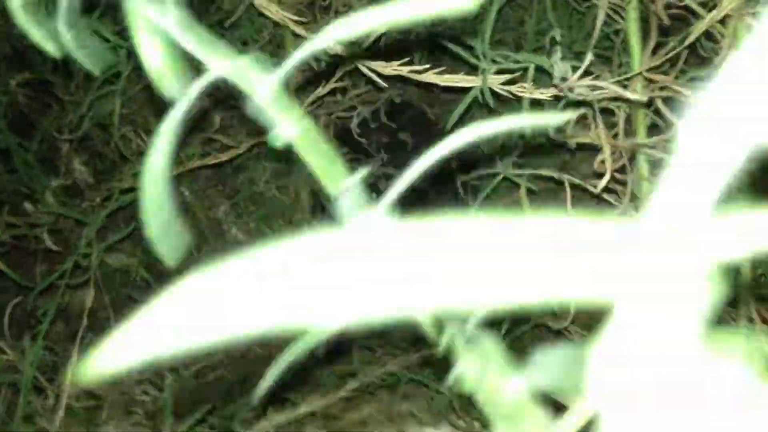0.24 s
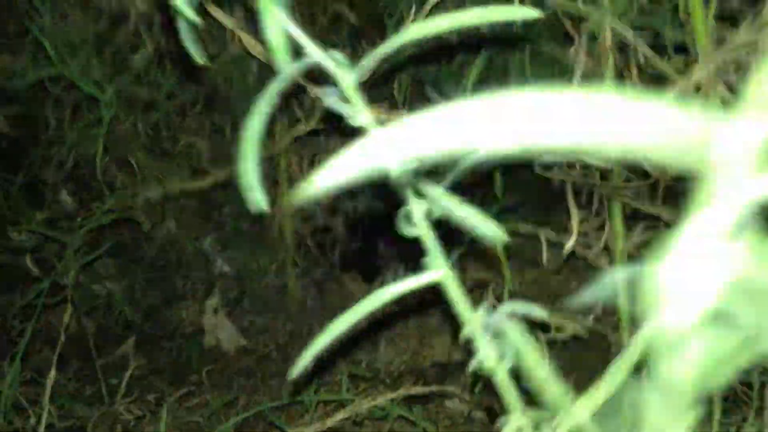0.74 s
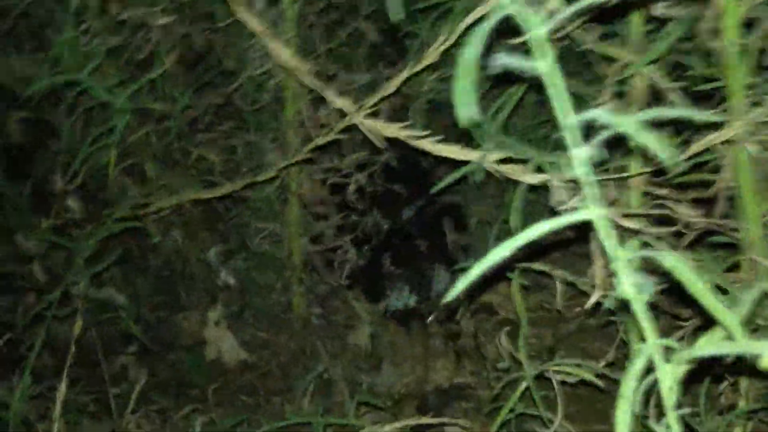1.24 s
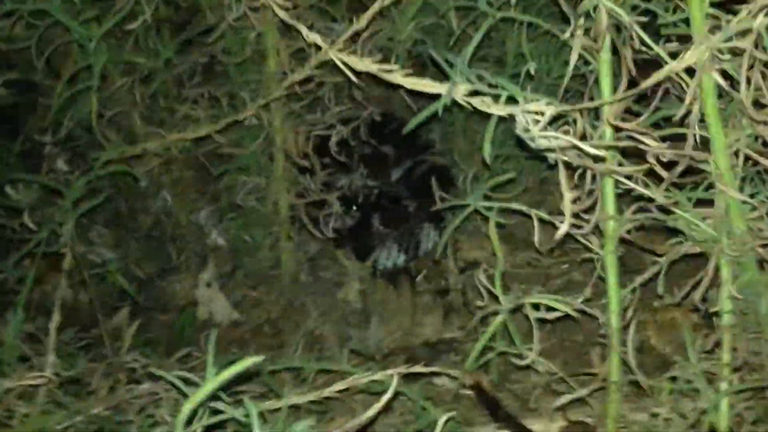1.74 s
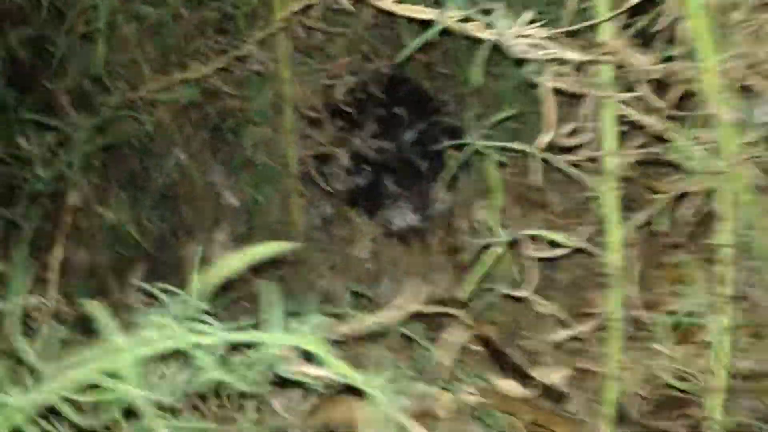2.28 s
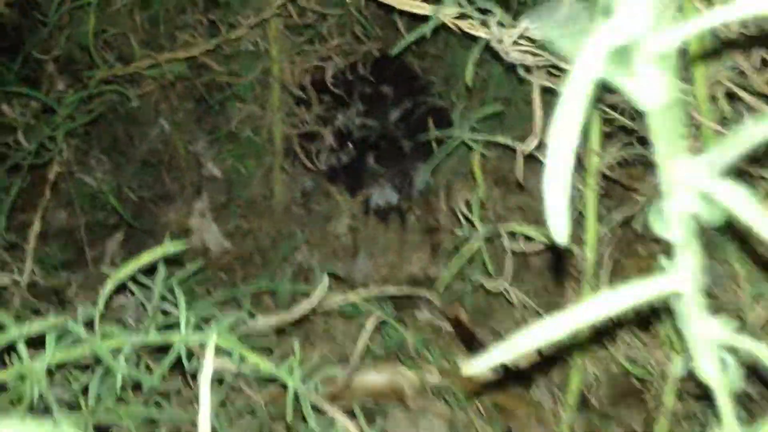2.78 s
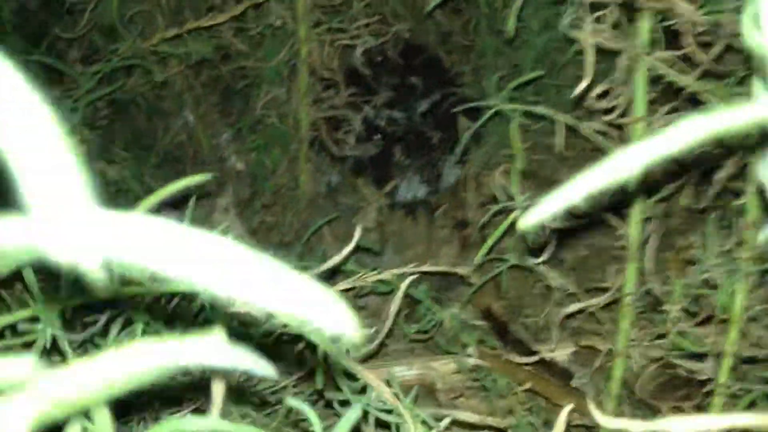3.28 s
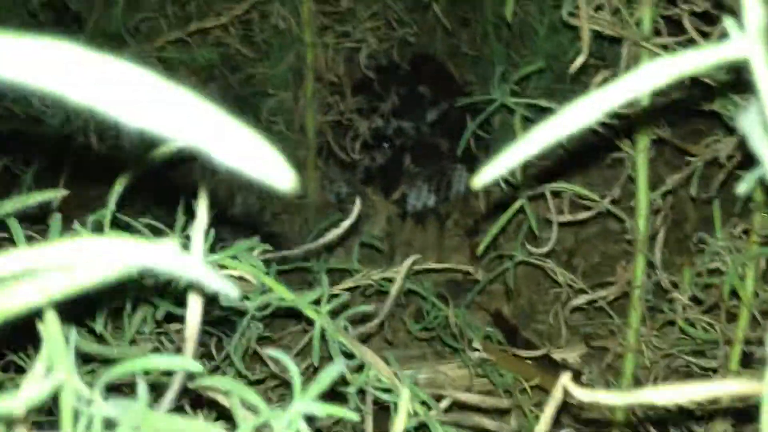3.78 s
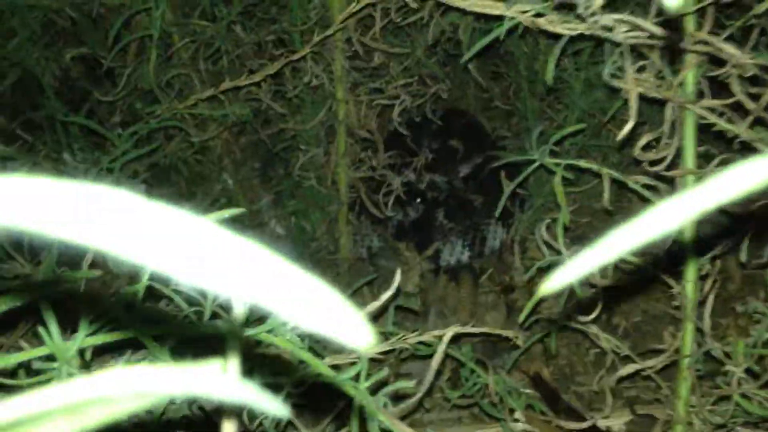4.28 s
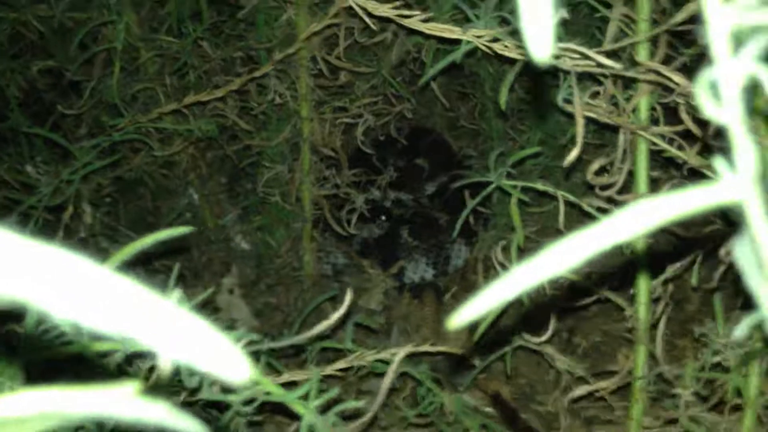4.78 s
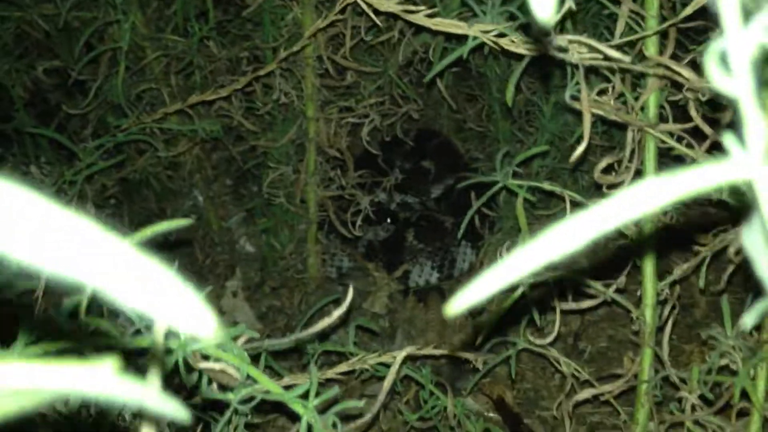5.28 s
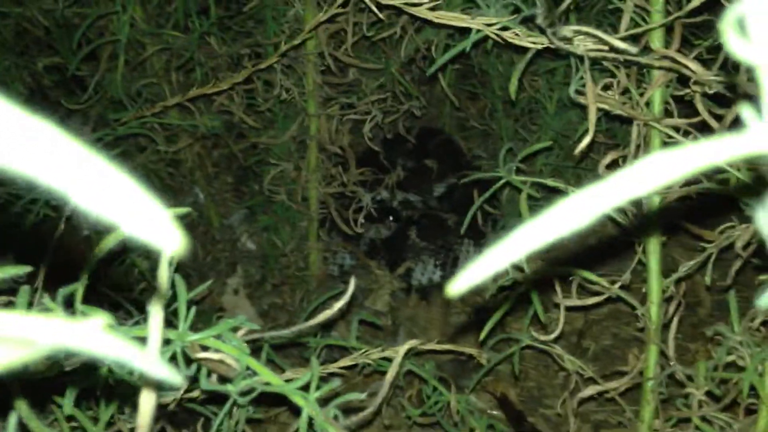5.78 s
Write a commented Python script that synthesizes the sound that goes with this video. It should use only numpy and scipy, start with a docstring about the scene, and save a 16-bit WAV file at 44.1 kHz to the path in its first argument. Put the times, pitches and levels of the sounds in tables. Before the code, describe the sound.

Continuous dry, sizzling rattle of a snake in weeds at night, with a brief cluster of twig snaps and leaf rustles.

```python
"""In weeds at night, a coiled rattlesnake buzzes its tail close to a handheld mono camera.
The tail swings about 60 times a second; at each turn the dry segments clatter and ring in their
hollow shells. An echo off the ground colours the buzz as the camera moves.
Stems snap and leaves brush past, with a few soft knocks, over a faint low rumble."""
import sys
import numpy as np
from scipy import signal
from scipy.fft import rfft, irfft, next_fast_len
from scipy.io import wavfile
from scipy.ndimage import map_coordinates

SR = 44100
rng = np.random.default_rng(int(sys.argv[2]) if len(sys.argv) > 2 else 0)


def generate_wav(sig):
    """Save sig (samples, or channels by samples) to the path in sys.argv[1] as 16-bit PCM at SR."""
    pcm = np.round(np.clip(np.atleast_2d(sig).T, -1, 1) * 32767).astype(np.int16)
    wavfile.write(sys.argv[1], SR, pcm)


N = 265923

# The snake briefly shakes harder.
# Each row: middle in seconds, extra swings a second, half length in seconds.
HARDER_SHAKES = [(2.153, 2.85, 0.37), (3.946, 3.09, .42)]
# How loud the rattle is. Each row: time in seconds, level in dB.
RATTLE_LEVELS = [(0, -31.5), (.9, -32), (1.4, -32.5), (3.1, -32), (6, -32)]
# The tone of the wide segments at the base. Each row: frequency in Hz, level in dB.
BASE_TONE = [(100, -67), (600, -48), (1750, -27.5), (2500, -12), (2950, -7.5), (3200, -7.5), (3450, -2.5),
             (3720, 0.7), (4200, -5), (4450, -10), (4950, -7), (6500, -11.5), (9000, -27)]
# The tone of the narrow segments at the tip. Each row: frequency in Hz, level in dB.
TIP_TONE = [(100, -76), (2000, -36.5), (4450, -22), (5000, -8.5), (5800, 0), (7300, 1), (8200, -7),
            (9200, -8.5), (10400, -4), (11700, 2), (12700, 0), (13600, -3), (14800, -2)]

def rattle(t):
    """Loose, hollow segments hit each other all the time, hardest at the two turns of each swing."""
    extra_hz = sum(hz * np.exp(-((t - s) / length) ** 2) for s, hz, length in HARDER_SHAKES)
    swing_hz = (59.3 + extra_hz) * (1 + 0.0064 * wobble(25.0))
    phase = 2 * np.pi * np.cumsum(swing_hz) / SR
    # the faster the tail swings, the more one turn outweighs the other
    lopsided = np.clip(0.28 + 0.093 * extra_hz, 0, 1)
    turns = lopsided * np.cos(phase) + (1 - lopsided) * np.cos(2 * phase)
    level_db, = curves(RATTLE_LEVELS, t)
    force_db = level_db + 1.9 * turns + 0.32 * wobble(11)
    # base and tip share the swing but jostle each in their own way
    base_hits = amp(0.56 * wobble(200) + 0.28 * wobble(10)) * contacts(rate=8000, scatter_db=1.5)
    tip_hits = amp(0.18 * wobble(250)) * contacts(rate=11000, scatter_db=2.0)
    base = amp(force_db - 5.0) * coloured(base_hits, BASE_TONE)
    tip = amp(force_db + 4.0) * coloured(tip_hits, TIP_TONE)
    return base + tip

def shifting_shells(buzz, swell_db=1.5, patch_hz=128.9, patch_s=0.12):
    """The loose shells keep shifting, so their ring swells and fades in patches of pitch and time."""
    hz, t, spectrum = signal.stft(buzz, SR, nperseg=1024)
    grid = np.meshgrid(hz / patch_hz, t / patch_s, indexing="ij")
    patches = map_coordinates(rng.standard_normal((512, 512)), grid, mode="wrap")
    return signal.istft(spectrum * amp(swell_db * patches), SR, nperseg=1024)[1][:N]

# The echo off the ground shifts as the camera moves.
# Each row: time in seconds, weakened frequency in Hz, boost or cut in dB of a band below it.
GROUND_ECHO = [(.2, 8400, -3), (1.3, 8370, 1), (2.2, 8400, -0.5), (2.7, 8200, -4), (3.6, 7850, 2),
               (4.2, 7830, 3), (5.2, 8070, 3)]

def ground_echo(buzz, dip_db=-9, dip_width_hz=235, lift_below_hz=1060, lift_width_hz=270):
    """The buzz and its echo partly cancel in one narrow band; a band below it swells and fades."""
    hz, t, spectrum = signal.stft(buzz, SR, nperseg=1024)
    dip_hz, lift_db = curves(GROUND_ECHO, t)
    dip = dip_db / (1 + ((hz[:, None] - dip_hz) / dip_width_hz) ** 2)
    lift = lift_db / (1 + ((hz[:, None] - dip_hz + lift_below_hz) / lift_width_hz) ** 2)
    return signal.istft(spectrum * amp(dip + lift), SR, nperseg=1024)[1][:N]

# Dry stems snapping. Each row: start in seconds, level in dB, pitch in Hz,
# length of the tear in seconds, boost or cut of the crack in dB.
STEM_SNAPS = [(1.8108, -13, 13600, 0.0011, -15), (1.931, -21, 7160, 0.0012, 2.5),
              (2.0325, -14.5, 6500, 0.0026, -2), (2.1624, -3.5, 14000, 0.001, -9),
              (2.335, -14, 12100, .001, -11), (2.346, -17, 11700, 0.0031, -7)]
# The tone of a cracking stem. Each row: frequency in Hz, level in dB.
CRACK_TONE = [(100, -31), (250, -15), (1200, -5.5), (2000, -4.5), (4000, 3.5), (9000, 0), (15000, -4.5)]

def snapping_stems(t):
    """Each stem tears in a brief burst around one pitch, with a noisy crack that dies in the weeds."""
    out = np.zeros(N)
    for start, db, hz, length, crack_db in STEM_SNAPS:
        age = np.maximum(t - start, 0)
        burst = np.sin(np.pi * np.minimum(age / length, 1))
        tear = burst * np.sin(2 * np.pi * hz * age + 0.75 * wobble(2500))
        fade = amp(crack_db - 7 - 60 * age / 0.02) * (age > 0)
        crack = fade * coloured(rng.standard_normal(N), CRACK_TONE)
        out += amp(db) * (tear + crack)
    return out

# Leaves brushing past. Each row: middle in seconds, level in dB, half length in seconds.
LEAF_BRUSHES = [(1.805, -31.5, 0.024), (2.036, -24, 0.02), (2.15, -26.5, 0.021), (2.308, -26.5, 0.045),
                (2.355, -24.5, 0.027)]
# The tone of the leaves. Each row: frequency in Hz, level in dB.
LEAF_TONE = [(40, -43), (220, -20), (450, -7.5), (900, -16), (1700, -6.5), (4000, -4), (8000, 6),
             (12000, 4), (15000, 13)]

def brushing_leaves(t):
    """Leaves scrape past in short swells of fine crackle."""
    power = sum(amp(db) ** 2 * np.exp(-((t - s) / length) ** 2) for s, db, length in LEAF_BRUSHES)
    return np.sqrt(power) * coloured(contacts(rate=8000, scatter_db=4.5), LEAF_TONE)

# Soft knocks. Each row: start in seconds, level in dB, pitch in Hz, seconds to fade by 60 dB.
SOFT_KNOCKS = [(0.265, -46, 234, 0.12), (.879, -45, 1470, .04), (1.932, -38, 700, 0.0098),
               (2.035, -41, 520, 0.011), (2.1613, -35, 397, 0.022), (2.329, -42, 1100, .012),
               (2.985, -32.5, 890, 0.006), (3.099, -40, 810, .02), (4.067, -44, 1150, .012)]

def soft_knocks(t):
    """Dull blows on stems and ground ring unsteadily and die away fast."""
    out = np.zeros(N)
    for start, db, hz, fade_s in SOFT_KNOCKS:
        age = np.maximum(t - start, 0)
        rise = 1 - np.exp(-age / 0.00019)
        ring = np.sin(2 * np.pi * hz * age + 0.81 * wobble(400))
        out += amp(db - 60 * age / fade_s) * rise * ring
    return out

# The tone of the night's background. Each row: frequency in Hz, level in dB.
NIGHT_TONE = [(25, 1), (50, -6), (85, -8), (112, 0.5), (135, 2), (165, -2), (200, 0), (270, -5), (650, -11),
              (1400, -9.5), (2500, -10), (6000, -34)]

def night_rumble(t, settle_s=1.7):
    """A faint, distant rumble starts a little louder and settles to a steady level."""
    level_db = -56.3 + 2.5 * np.exp(-t / settle_s)
    return amp(level_db) * coloured(rng.standard_normal(N), NIGHT_TONE)

def amp(db):
    """Turns decibels into a number to multiply by."""
    return 10 ** (np.asarray(db) / 20)

def unit(x):
    """Scales a sound to an average strength (rms) of 1."""
    return x / np.sqrt(np.mean(x ** 2) + 1e-20)

def curves(rows, t):
    """Reads each column after the first at the times t."""
    times, *columns = np.transpose(rows)
    return [np.interp(t, times, column) for column in columns]

def wobble(rate):
    """A smooth curve through `rate` random points a second."""
    return map_coordinates(rng.standard_normal(int(N * rate / SR) + 4), [np.arange(N) * rate / SR])

def coloured(x, tone):
    """Gives a sound the tone in a table, at an average strength of 1."""
    size = 4096
    hz, db = np.transpose(tone)
    gain = amp(np.interp(np.log(np.fft.rfftfreq(size, 1 / SR) + 1), np.log(hz), db))
    # build a filter that rings only after each hit, never before it
    cepstrum = irfft(np.log(gain))
    cepstrum[1:size // 2] *= 2
    cepstrum[size // 2 + 1:] = 0
    ring = irfft(np.exp(rfft(cepstrum)))
    return unit(signal.fftconvolve(x, ring)[:N])

def contacts(rate, scatter_db):
    """Tiny hits of random size and direction, about `rate` a second."""
    hit = rng.random(N) < rate / SR
    return unit(hit * rng.choice([-1, 1], N) * amp(scatter_db * rng.standard_normal(N)))

def scene():
    """The snake, the weeds and the night reach one microphone, which feeds both channels."""
    t = np.arange(N) / SR
    snake = ground_echo(shifting_shells(rattle(t)))
    mono = snake + snapping_stems(t) + brushing_leaves(t) + soft_knocks(t) + night_rumble(t)
    return np.array([mono, mono])

def record(dry):
    """The camera thins the deep bass and cuts off the very highest treble."""
    low_cut_hz, top_hz = 100, 15310
    thin = signal.sosfilt(signal.butter(3, low_cut_hz, "high", fs=SR, output="sos"), dry)
    size = next_fast_len(N + SR // 2)
    hz = np.fft.rfftfreq(size, 1 / SR)
    gain = np.clip((top_hz - hz) / 150 + 0.5, 0, 1)
    return irfft(rfft(thin, size) * gain, size)[:, :N]

dry = scene()
out = record(dry)
generate_wav(out)
```